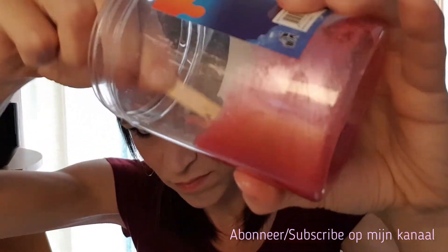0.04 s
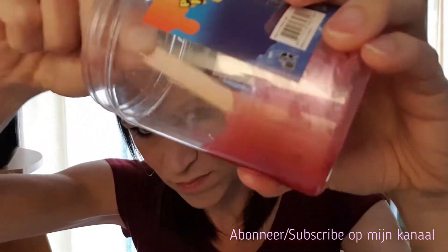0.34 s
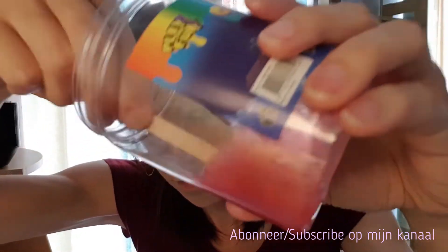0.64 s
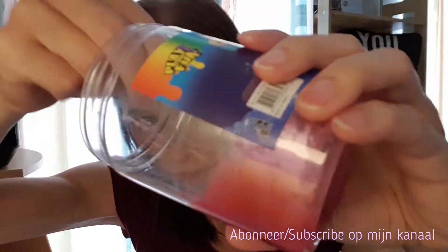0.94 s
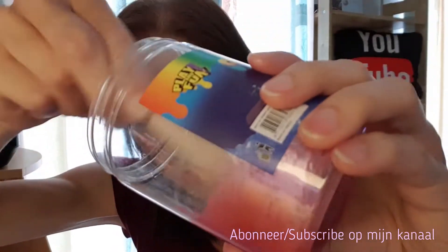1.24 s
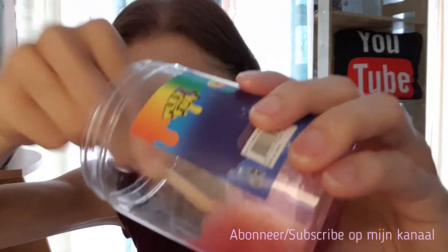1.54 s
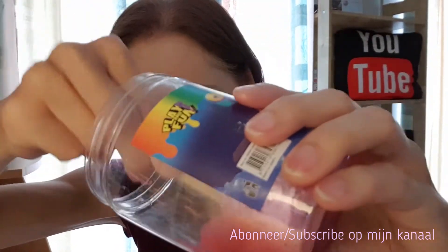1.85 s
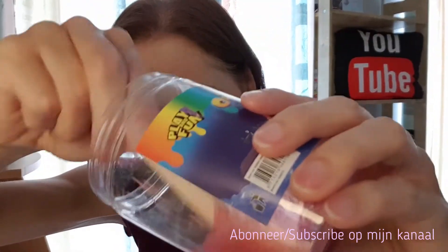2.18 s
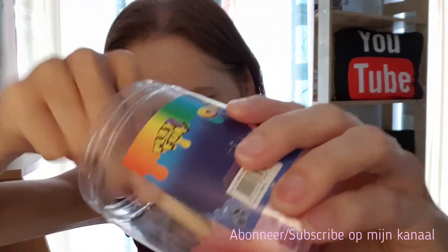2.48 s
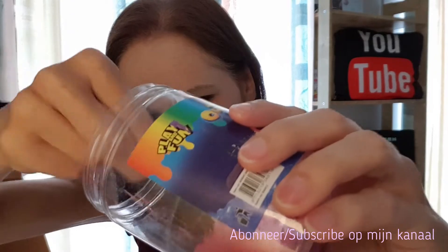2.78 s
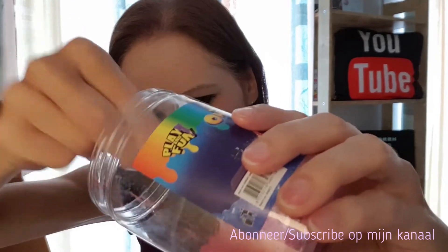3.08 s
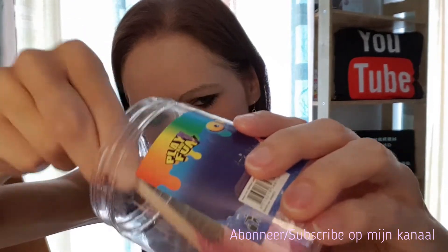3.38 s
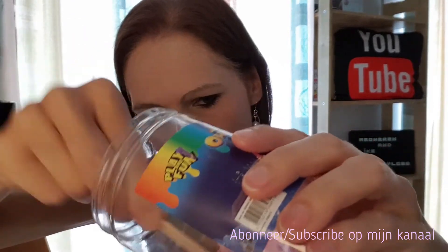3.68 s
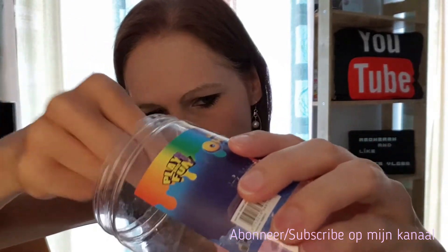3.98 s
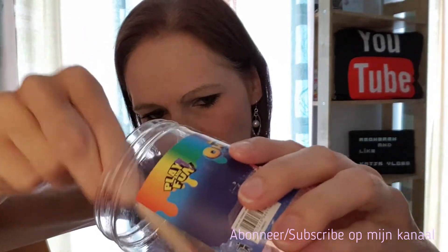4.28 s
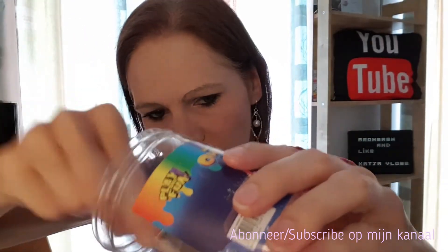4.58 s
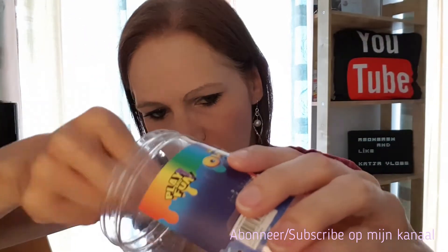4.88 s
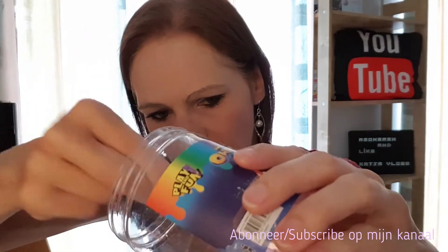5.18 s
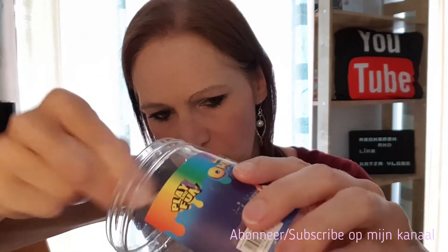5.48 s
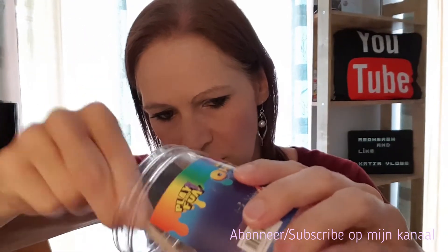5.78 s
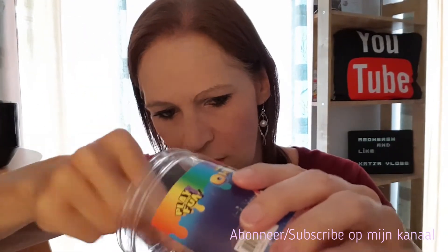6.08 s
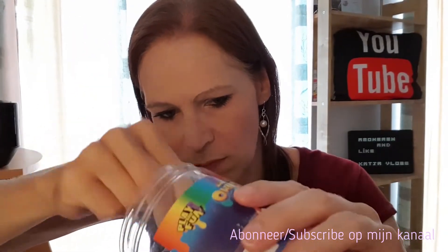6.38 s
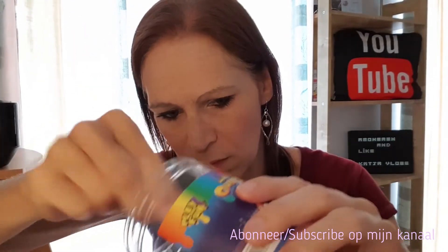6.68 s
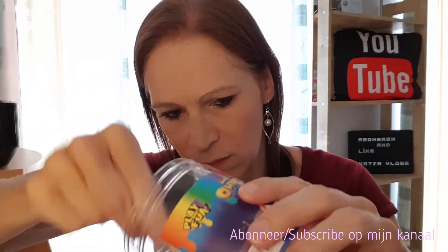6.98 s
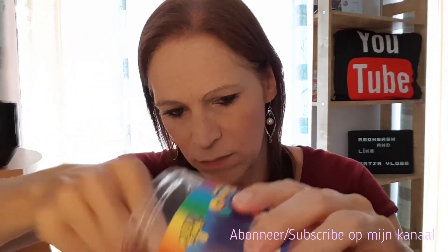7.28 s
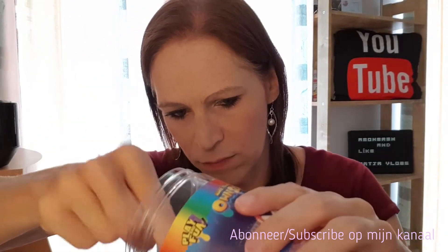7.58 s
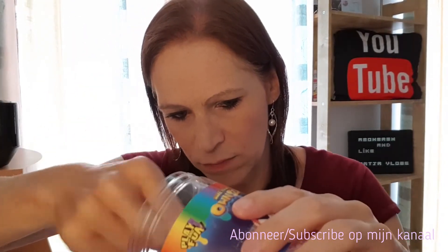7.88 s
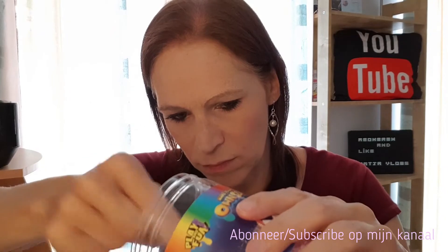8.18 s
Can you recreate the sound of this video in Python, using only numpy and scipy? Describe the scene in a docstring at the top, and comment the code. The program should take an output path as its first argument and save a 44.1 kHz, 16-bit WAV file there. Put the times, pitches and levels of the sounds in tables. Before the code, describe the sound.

Close, wet squelches and crackles of slime being stirred, while a wooden stick now and then knocks against the plastic jar.

```python
"""A soft thud and a light knock, then sticky crackling: a wooden stick stirs thick slime in a plastic jar,
hand-held close to a stereo microphone in a small room. About four times a second the stick drags through
the mass, breaking threads and bubbles; now and then it snaps free or knocks on the wall. These contacts
ring the air in the jar, and the jar bounces in the palm. Behind it lie room tone and a faint low drone."""
import sys
import numpy as np
from scipy import signal
from scipy.fft import rfft, irfft
from scipy.io import wavfile

SR = 44100
rng = np.random.default_rng(int(sys.argv[2]) if len(sys.argv) > 2 else 0)


def persist_wave(psi):
    """Save psi, clipped to +-1, as 16-bit WAV."""
    counts = np.round(np.clip(psi, -1, 1) * 32767).astype(np.int16)
    wavfile.write(sys.argv[1], SR, np.atleast_2d(counts).T)


N = 372644

# Levels are relative within each table; the functions set the balance.
# the quiet room at the microphone: (frequency [Hz], level per Hz [dB])
ROOM_TONE = [(20, -23), (55, -1.5), (110, 1), (200, -6), (275, -2), (400, -8), (650, -14), (900, -23),
             (2000, -28.5), (4000, -26.5), (6500, -30.5), (11000, -30), (16000, -29)]
# how alike the room tone is on both sides: (frequency [Hz], likeness [0-1])
TONE_LIKENESS = [(60, 0.91), (250, 0.9), (600, 0.72), (1500, 0), (5000, 0), (16000, 0.39)]
# a low drone that swells and fades: (time [s], level [dB])
DRONE = [(0, -59), (0.4, -52), (0.65, -48.5), (0.95, -54.5), (1.3, -53), (1.9, -55), (2.2, -65),
         (8.45, -75.5)]
# decay of the small room: (frequency [Hz], t60 [s])
ROOM_T60 = [(100, 1), (600, 0.56), (2500, 0.4), (6000, 0.36), (15000, 0.25)]
# spectrum of its reflections: (frequency [Hz], level [dB])
ROOM_COLOUR = [(200, 2), (600, -2), (1200, -3), (2500, -1.5), (5000, -2.5), (10000, -0.5), (16000, 3)]
# its standing waves: (frequency [Hz], level [dB], t60 [s], left over right [dB])
ROOM_MODES = [(404, 1.5, 0.086, -5.5), (601.6, -3, 0.25, 21)]
# the jar jolts in the hand: (time [s], level [dB])
THUDS = [(0.002, -29.5), (1.136, -34.5), (1.446, -34.5), (1.612, -42.5), (1.754, -45), (1.954, -36.5),
         (3.014, -42), (3.492, -43.5), (4.184, -39), (4.686, -44), (4.819, -41.5), (5.05, -43),
         (5.321, -37), (5.418, -43), (5.908, -39)]
# a finger judders over the plastic: (time [s], level [dB])
FINGER = [(0.41, -65), (0.44, -36), (0.48, -36), (0.53, -34), (0.57, -43), (0.67, -47.5), (0.75, -54.5),
          (0.82, -56)]
# stick on wall: (time [s], level [dB], hardness [0-1], clack offset [dB], hollow note [Hz])
KNOCKS = [(0.004, -44, 0.94, -7, 540), (0.361, -40, 0.6, -2.5, 584), (0.5646, -43.5, .2, -6, 640),
          (1.438, -34.5, 0.97, -9, 579), (1.673, -30.5, 0.8, -6.5, 566), (1.7148, -26, .25, -9.5, 645),
          (1.9045, -30, 0.77, 0, 576), (2.1415, -25, 0.61, -5.5, 622), (2.17, -25, 0.33, -19, 640),
          (2.209, -44, .4, 0.5, 606), (2.364, -26.5, 0.6, -6.5, 616), (3.338, -43.5, 0.76, -7.5, 640),
          (3.357, -17.5, 0.14, -16, 623), (4.355, -39, 0.1, -15.5, 640), (4.667, -42.5, 0.76, -8.5, 640),
          (5.328, -41, 0.37, -20, 630), (5.425, -42.5, 0.38, -23, 659), (6.128, -44, 0, -20, 640),
          (6.5304, -36, 0.44, -8, 582), (6.778, -39, 0.5, -10, 590), (7.046, -40.5, 0.48, -7.5, 589),
          (7.366, -46.5, 0.1, -12, 640), (7.571, -31.5, 0.1, -27, 640), (7.5865, -31, 0.05, -8, 603),
          (7.593, -28, 0.28, -10.5, 613), (7.676, -39, .05, -11.5, 600), (7.899, -41.5, 0.2, -10, 635)]
# modes of the plastic wall: (frequency [Hz], level [dB], t60 [s])
WALL_MODES = [(1063, 0, 0.041), (1198, 12, 0.013), (1550, -2.5, 0.0084), (1920, -0.5, 0.043),
              (2210, 6.5, 0.018), (2670, 6.5, 0.022), (3880, 1, 0.012)]
# low modes of the filled jar: (frequency [Hz], level [dB], t60 [s])
BODY_MODES = [(411.3, -4.5, 0.092), (492, -5, 0.082)]
# the dry clack of wood on plastic: (frequency [Hz], level [dB])
CLACK_COLOUR = [(400, -8.5), (1000, -2), (1700, 3), (2700, -6.5), (4500, -12.5), (7000, -20.5),
                (16000, -38)]
# the bright crack of knocks and snaps: (frequency [Hz], level [dB])
CRACK_COLOUR = [(1000, -14), (3000, -15.5), (5500, 5.5), (8200, 1), (10000, 0), (13000, -1.5),
                (16000, -12.5)]
# small air pockets pop: (time [s], pitch [Hz], level [dB])
POPS = [(0.362, 2250, -33), (1.342, 8300, -40), (3.67, 2000, -50), (3.943, 4750, -39), (7.862, 2350, -54),
        (8.33, 2300, -50)]
# the stick catches and snaps free: (time [s], level [dB], treble offset [dB])
SNAPS = [(0.0927, -37.5, -9), (0.1486, -37.5, -25), (0.3596, -39, -13), (0.4469, -40.5, -8),
         (0.5646, -40.5, -21), (0.8344, -54.5, 5), (1.3409, -43.5, -5), (1.5015, -37.5, -5.5),
         (1.7484, -34, -8.5), (1.8113, -33, -8), (1.957, -38.5, -6.5), (2.2374, -44.5, -0.5),
         (2.4543, -34.5, -13.5), (2.7264, -53, 7), (3.0165, -34.5, -6.5), (3.1547, -53.5, 6.5),
         (3.3962, -37, -5.5), (3.7189, -42.5, -10), (3.9434, -40, -7), (4.1849, -38.5, -5.5),
         (4.6668, -37.5, -8), (4.8848, -36, -11), (5.4236, -42.5, -18), (5.6406, -41, -5),
         (5.8282, -42, -11), (6.5286, -37.5, -11), (7.2918, -47.5, -1), (7.3014, -46.5, 3.5),
         (8.08, -47, 2.5)]
# the body of a snap: (frequency [Hz], level [dB])
SNAP_COLOUR = [(300, 9), (900, 2.5), (1400, -2), (2000, -1.5), (2800, 4.5), (3500, 4), (4600, -0.5),
               (6000, -13.5), (9000, -31), (16000, -26)]
# the stick drags through the slime: (start [s], length [s], level [dB])
STROKES = [(0.001, 0.044, -58), (0.079, 0.18, -62), (0.311, 0.04, -58.5), (0.425, 0.032, -61),
           (0.618, 0.033, -61.5), (0.776, 0.12, -65.5), (0.963, .012, -68), (1.075, 0.081, -63.5),
           (1.295, 0.075, -66.5), (1.498, 0.085, -65), (1.753, 0.093, -62), (1.958, .11, -63),
           (2.231, 0.057, -58.5), (2.423, 0.12, -57), (2.699, .095, -66.5), (2.954, 0.052, -68.5),
           (3.152, 0.071, -69), (3.397, 0.12, -56.5), (3.668, 0.084, -63), (3.878, 0.12, -65),
           (4.09, 0.12, -63.5), (4.36, 0.084, -61), (4.584, .12, -65), (4.822, 0.12, -61.5),
           (5.113, .11, -61.5), (5.324, 0.12, -64), (5.594, 0.093, -58), (5.828, 0.11, -61),
           (6.071, 0.084, -62.5), (6.341, 0.054, -64), (6.527, 0.098, -56.5), (6.773, .085, -59),
           (7.042, .1, -59.5), (7.292, 0.1, -59.5), (8.079, .11, -63), (8.304, 0.066, -63.5)]
# the strokes' treble against their squelch: (time [s], level [dB])
BRIGHTNESS = [(0, 1), (0.3, -2.5), (0.85, 6), (1.1, 4), (1.8, 5.5), (2.05, -2), (2.45, -2), (2.75, 3),
              (3.15, 8), (3.5, 0.5), (4.2, 0), (5.2, 1.5), (5.65, -1), (6.1, -1), (6.8, -5.5), (7.1, -4),
              (7.32, 1.5), (8.1, -1), (8.45, 1)]
# the wet squelch of a stroke: (frequency [Hz], level [dB])
SQUELCH_COLOUR = [(200, -34), (600, 11), (1100, 10), (2000, -4), (2800, -1), (4300, 4.5), (6000, -10.5),
                  (9000, -43), (16000, -29)]
# the fine fizz above it: (frequency [Hz], level [dB])
FIZZ_COLOUR = [(2000, -5), (4500, -4), (6000, -14.5), (8300, -5), (10000, -9), (13000, -9.5),
               (16000, -15.5)]

AIR_HZ, AIR_T60_S = 640, 0.054   # the air in the open jar


def from_db(db):
    """Decibels to amplitude."""
    return 10 ** (np.asarray(db) / 20)


def rms_one(x):
    """Scale to rms 1."""
    return x / np.sqrt(np.mean(x ** 2) + 1e-20)


def in_time(rows):
    """A level curve in dB joined by straight lines, silent outside its span."""
    return np.interp(np.arange(N) / SR, *np.transpose(rows), left=-np.inf, right=-np.inf)


def at_hz(points, hz):
    """A spectrum read on a log-frequency axis."""
    freqs, values = np.transpose(points)
    return np.interp(np.log(np.maximum(hz, 1)), np.log(freqs), values)


def panned(db):
    """Stereo gains, the left louder by db."""
    return from_db(np.array([[.5], [-.5]]) * db)


def drift(rate_hz):
    """A random wander with rms 1."""
    knots = rng.standard_normal(int(N / SR * rate_hz) + 2)
    return rms_one(np.interp(np.arange(N) / SR * rate_hz, np.arange(len(knots)), knots))


def add(out, s, sound):
    """Mix a short sound in at time s."""
    at = max(round(s * SR), 0)
    part = out[:, at:at + sound.shape[1]]
    part += sound[:, :part.shape[1]]


def clicks(times, heights):
    """One click at each time."""
    out = np.zeros(N)
    np.add.at(out, np.clip(np.round(times * SR).astype(int), 0, N - 1), heights)
    return out


def ring(x, hz, t60):
    """A resonator: a unit click sets it ringing at a height near 1."""
    radius, angle = from_db(-60 / (t60 * SR)), 2 * np.pi * hz / SR
    return signal.lfilter([1, -1], [1, -2 * radius * np.cos(angle), radius * radius], x + 1e-18)


def damped(hz, t60, lag_s, size=8192):
    """A struck mode as a dying sine; it reaches the right channel lag_s later."""
    t = np.maximum(np.arange(size) / SR - np.array([[0], [lag_s]]), 0)
    return np.sin(2 * np.pi * hz * t) * from_db(-60 * t / t60)


def filtered(x, order, hz, kind):
    """A maximally flat low-, high- or band-pass."""
    return signal.sosfilt(signal.butter(order, hz, kind, fs=SR, output="sos"), x + 1e-18)


def coloured(x, spectrum, size=2048):
    """Causal (minimum-phase) filter with the given spectral shape and unit energy."""
    gains = from_db(at_hz(spectrum, np.fft.rfftfreq(size, 1 / SR)))
    cepstrum = irfft(np.log(gains))
    cepstrum[1:size // 2] *= 2
    cepstrum[size // 2 + 1:] = 0
    kernel = irfft(np.exp(rfft(cepstrum)))
    return signal.oaconvolve(x, kernel[None] / np.linalg.norm(kernel), axes=1)[:, :N]


def left_right(mid, side, alike):
    """Blend two independent noises into a stereo pair with correlation alike."""
    return (np.sqrt(1 + alike) * mid + np.sqrt(1 - alike) * side * [[1], [-1]]) / np.sqrt(2)


def grains(size, per_s, size_db):
    """Clicks at random moments, most small and a few large."""
    born = rng.random(size) < per_s / SR
    return born * from_db(size_db * np.minimum(rng.exponential(1, size), 3))


def crackle(size, per_s, size_db, alike):
    """Tiny random breaks in stereo; rms 1."""
    return rms_one(grains(size, per_s, size_db) * left_right(*rng.standard_normal((2, size)), alike))


def bursts(times, levels_db, colour, rise_s, t60, alike, size=2048):
    """Each contact is a cluster of tiny breaks that builds up and dies away."""
    out, t = np.zeros((2, N)), np.arange(size) / SR
    envelope = (1 - np.exp(-t / rise_s)) * from_db(-60 * t / t60)
    for s, db in zip(times, levels_db):
        cluster = crackle(size, per_s=15000, size_db=3.0, alike=alike) * envelope
        add(out, s, from_db(db) * rms_one(cluster))
    return coloured(out, colour)


def background(tone_db=-61, drone_hz=50):
    """Steady room tone, alike on both sides in the bass, and a low wavering drone."""
    hz = np.fft.rfftfreq(N, 1 / SR)
    mid, side = rfft(rng.standard_normal((2, N)))
    white = left_right(mid, side, at_hz(TONE_LIKENESS, hz))
    tone = irfft(white * from_db(at_hz(ROOM_TONE, hz)), N)
    pitch = drone_hz * (1 + 0.0426 * drift(5.9))
    drone = np.sin(2 * np.pi * np.cumsum(pitch) / SR)
    return from_db(tone_db) * rms_one(tone) + from_db(in_time(DRONE)) * rms_one(drone)


def reflections(x, first_s=0.0022, build_s=0.0012, size=32768):
    """Diffuse reflections build up after the nearest wall and die sooner in the treble."""
    t, hz = np.arange(size) / SR, np.fft.rfftfreq(size, 1 / SR)
    noise = left_right(*rng.standard_normal((2, size)), alike=0.26)
    spectrum = rfft(noise) * from_db(at_hz(ROOM_COLOUR, hz))
    centres, decays = np.transpose(ROOM_T60)
    tail = 0
    for t60, share in zip(decays, np.eye(len(centres))):
        band = irfft(spectrum * at_hz(np.c_[centres, share], hz))
        tail = tail + band * from_db(-60 * t / t60)
    tail *= np.clip((t - first_s) / build_s, 0, 1)
    return signal.fftconvolve(x, rms_one(tail) / np.sqrt(size), axes=1)[:, :N]


def standing_waves(x):
    """Each room mode takes up the sound near its own pitch and hums on."""
    return sum(from_db(db) * ring(x, hz, t60) * 2 * np.log(1000) / (t60 * SR) * panned(pan)
               for hz, db, t60, pan in ROOM_MODES)


def finger(judder_hz=124, waver=0.069):
    """A finger slips over the plastic once, juddering and rubbing."""
    phase = 2 * np.pi * np.cumsum(judder_hz * (1 + waver * drift(45.9))) / SR
    rub = rms_one(filtered(rng.standard_normal(N), 2, [70, 190], "band"))
    return from_db(in_time(FINGER)) * (np.sin(phase) + .5 * rub)


def thuds(gain_db=5, nudge_db=9):
    """The jar bounces on the soft palm for a few slow cycles; every stroke nudges it too."""
    times, db = np.transpose(THUDS)
    starts, _, stroke_db = np.transpose(STROKES)
    jolts = clicks(times, from_db(db)) + clicks(starts, from_db(stroke_db + nudge_db))
    bounce = ring(jolts, hz=75.6, t60=0.091) + from_db(-9.5) * ring(jolts, hz=118, t60=0.084)
    return from_db(gain_db) * filtered(bounce, 2, 200, "low")


def jar_air(x, hz, swell_t60=0.0083):
    """Small sounds inside the jar make its air swell into a hollow note."""
    return ring(ring(x, hz, AIR_T60_S), hz, swell_t60) * 20 / (swell_t60 * SR)


def jar_wall(spread_db=3.5, detune=0.015):
    """The plastic rings in modes that shift with the spot that is hit."""
    hz, db, t60 = np.transpose(WALL_MODES)
    count = len(hz)
    strengths = from_db(db + spread_db * rng.standard_normal(count)) * rng.choice([-1, 1], count)
    pitches = hz * (1 + detune * rng.standard_normal(count))
    lags = rng.uniform(.00005, .00035, count)
    return sum(strength * damped(pitch, decay, lag)
               for strength, pitch, decay, lag in zip(strengths, pitches, t60, lags))


def knocks(air_db=6, thock_db=-6, body_db=6, wall_db=-3, clack_db=-12, crack_db=-15, low_cut_hz=300):
    """Wood on plastic: a crack, a dry clack, and the ringing of the jar's air, body and wall."""
    ringing = np.zeros((2, N))
    times, levels, hardness, clack_offsets, notes = np.transpose(KNOCKS)
    clack_levels = levels + clack_offsets
    # a harder knock drives the body more and cracks more
    body_levels = levels + np.interp(hardness, [0, 1], [-34.5, -1])
    crack_levels = levels + np.interp(hardness, [0, 1], [-36, -5.5])
    body = sum(from_db(db) * damped(hz, t60, lag_s=.0001) for hz, db, t60 in BODY_MODES)
    thock = damped(hz=940, t60=.012, lag_s=.0002) * panned(1.0)   # the wall gives way under the stick
    for s, level, body_level, clack_level, hz in zip(times, levels, body_levels, clack_levels, notes):
        # the jar's mouth points left of the microphone, so its note is louder and earlier there
        hollow = damped(hz, t60=.046, lag_s=.00022) * panned(7.5)
        add(ringing, s, from_db(level + air_db) * (hollow - from_db(thock_db) * thock))
        add(ringing, s, from_db(body_level + body_db) * body)
        add(ringing, s, from_db(clack_level + wall_db) * jar_wall() * panned(1.34))
    ringing = filtered(ringing, 3, low_cut_hz, "high")   # so small a body radiates no bass
    clack = bursts(times, clack_levels + clack_db, CLACK_COLOUR, rise_s=0.0005, t60=0.027, alike=0.14)
    crack = bursts(times, crack_levels + crack_db, CRACK_COLOUR, rise_s=0.00037, t60=0.017, alike=0.15)
    return ringing + clack * panned(3.2) + crack


def pops():
    """Each air pocket rings briefly at its own pitch."""
    out = np.zeros((2, N))
    for s, hz, db in POPS:
        add(out, s, from_db(db) * damped(hz, t60=.018, lag_s=0))
    return out


def small_snaps(loosen_db=9.5, stray_db=12.5, spread_db=0.5, treble_db=-6):
    """The stick pulls loose as each stroke opens and snaps once more later in it; rows as in SNAPS."""
    starts, lengths, db = np.transpose(STROKES)
    later = starts + lengths * rng.uniform(.3, 1, len(starts))
    times = np.r_[starts, later]
    levels = np.r_[db + loosen_db, db + stray_db + spread_db * rng.standard_normal(len(starts))]
    return np.c_[times, levels, treble_db + np.interp(times, *np.transpose(BRIGHTNESS))]


def snaps(body_db=-14, treble_db=-11, air_db=-49, air_follows=0.33):
    """Bright sticky releases stir the jar's air only a little, strong ones hardly more than weak."""
    times, db, treble = np.vstack([SNAPS, small_snaps()]).T
    body = bursts(times, db + body_db, SNAP_COLOUR, rise_s=0.00065, t60=0.023, alike=0.31)
    top = bursts(times, db + treble + treble_db, CRACK_COLOUR, rise_s=0.00076, t60=.02, alike=0.05)
    puffs = clicks(times, from_db(air_db + air_follows * (db - db.mean())))
    return body * panned(1.7) + top * panned(-1.4) + jar_air(puffs * panned(7.3), AIR_HZ)


def bubbles(cycles=18, shift_db=7.5, low_hz=1800, high_hz=7500, sizes=16):
    """Tiny bubbles burst at random and ring a few cycles; the sizes that prevail keep shifting."""
    born = grains(N, per_s=600, size_db=1.5) * rng.choice([-1, 1], N)
    size_class, out = rng.integers(0, sizes, N), 0
    for k, hz in enumerate(np.geomspace(low_hz, high_hz, sizes)):
        bursting = born * (size_class == k) * from_db(shift_db * np.tanh(drift(11)))
        out = out + ring(bursting, hz, cycles / hz) * panned(rng.uniform(-8, 12))
    return rms_one(out)


def stroke_envelope(attack_s=.008, release_s=0.022, fade_db=2.5):
    """Each stroke sets in quickly and dies down a little from start to end."""
    t, envelope = np.arange(N) / SR, np.zeros(N)
    for start, length, db in STROKES:
        rise = (t - start) / attack_s + .5
        fall = (start + length - t) / release_s + 1
        gate = np.clip(np.minimum(rise, fall), 0, 1)
        progress = np.clip((t - start) / length, 0, 1)
        envelope += gate * from_db(db - fade_db * (progress - .5))
    return envelope


def drag(squelch_db=-3, air_db=2, clump_db=2.5, narrowed_hz=700):
    """Threads and bubbles of slime break in clumps for as long as a stroke lasts."""
    clumps = rms_one(from_db(clump_db * drift(150)))
    coarse = clumps * crackle(N, per_s=2000, size_db=5.0, alike=0.054)
    fine = clumps * crackle(N, per_s=5700, size_db=1.5, alike=0)
    squelch = coloured(coarse, SQUELCH_COLOUR) * panned(2.2) + bubbles()
    fizz = coloured(fine, FIZZ_COLOUR) * from_db(in_time(BRIGHTNESS))
    # the hollow note wanders as hand and slime change the shape of the air in the jar
    narrowing = (1 + np.tanh(2 * drift(8.2))) / 2
    air = (1 - narrowing) * jar_air(coarse, AIR_HZ) + narrowing * jar_air(coarse, narrowed_hz)
    hollow = rms_one(air) * panned(6.1)
    return stroke_envelope() * (from_db(squelch_db) * squelch + from_db(air_db) * hollow + fizz)


def scene():
    """The jar in the hand, close to the microphone, with the small room behind it."""
    jar = knocks() + snaps() + pops() + drag()
    radiated = jar.mean(0, keepdims=True)
    room = from_db(-4.0) * reflections(radiated) + standing_waves(radiated)
    hand = (thuds() + finger()) * panned(1.0)
    return jar + room + hand + background()


def record(dry):
    """The top is cut steeply at 15.9 kHz."""
    return signal.sosfilt(signal.ellip(10, .1, 70, 15900, fs=SR, output="sos"), dry)


dry = scene()
out = record(dry)
persist_wave(out)
```